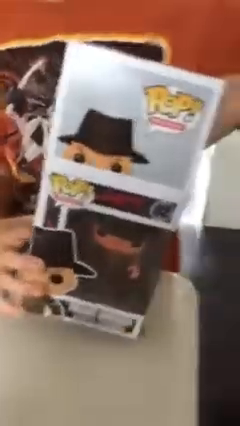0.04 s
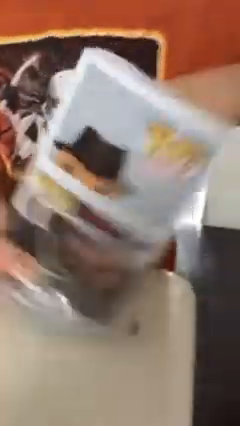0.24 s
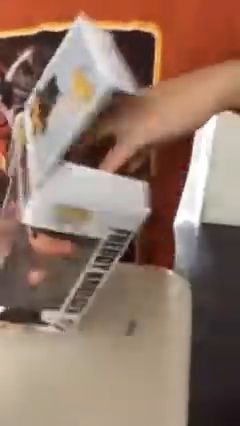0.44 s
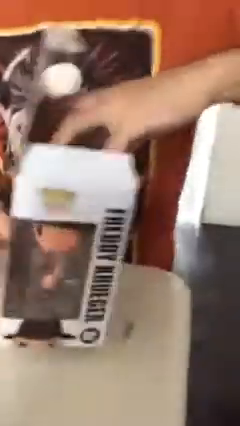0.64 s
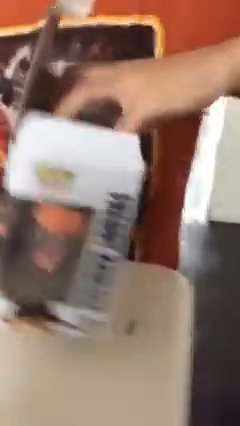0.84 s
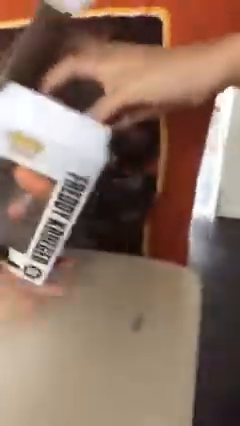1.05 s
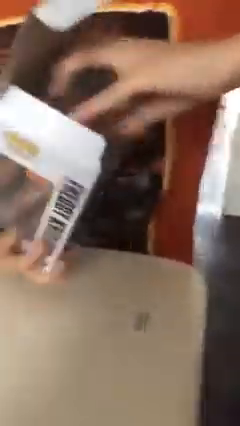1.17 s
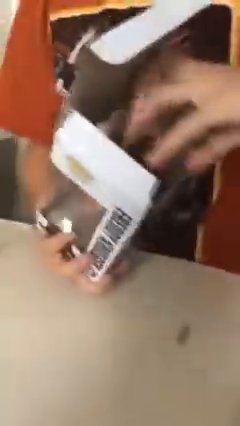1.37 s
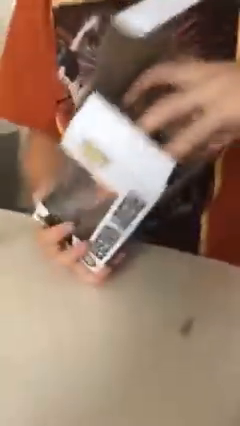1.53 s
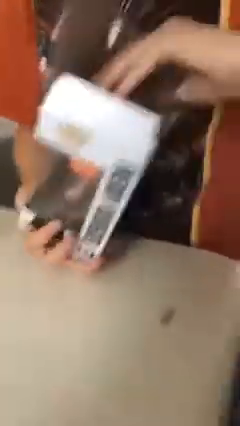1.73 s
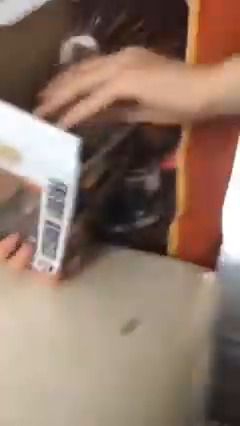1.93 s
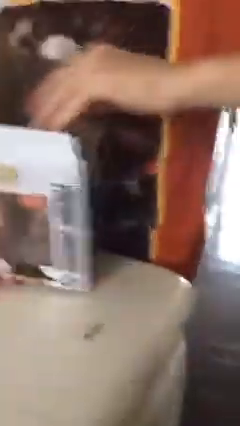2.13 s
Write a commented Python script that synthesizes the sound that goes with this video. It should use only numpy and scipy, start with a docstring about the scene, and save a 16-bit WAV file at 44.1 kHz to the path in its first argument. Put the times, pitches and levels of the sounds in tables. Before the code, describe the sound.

Hard cardboard taps and crinkly plastic snaps as a light empty box is handled in a quiet room

```python
"""A hand turns a small cardboard box with a plastic window on a table in a quiet room.
Under a steady, mostly rumbling air noise the window rustles and fingers rub the card: dense tiny slips ring modes.
Soon edges of the box knock on the table and the window snaps and crackles: rough pushes ring dying modes.
Low dying sines give short dull pushes under hard knocks and longer booms of the table top;
sparse random reflections let the room ring briefly after knocks and snaps."""
import sys
import numpy as np
from scipy import signal
from scipy.fft import rfft, irfft
from scipy.io import wavfile
from scipy.ndimage import uniform_filter1d

SR = 44100
rng = np.random.default_rng(int(sys.argv[2]) if len(sys.argv) > 2 else 0)


def store_pcm(level_fs):
    """Save levels as 16-bit WAV."""
    pcm = np.round(np.clip(level_fs, -1, 1) * 32767).astype(np.int16)
    wavfile.write(sys.argv[1], SR, np.atleast_2d(pcm).T)


def magnitude_from_level(level_db):
    """Linear magnitude for a level in decibels (20 dB per decade)."""
    exponent = np.asarray(level_db, float) / 20
    return 10 ** exponent


N = 97020

# resonances of the cardboard box: pitch_hz [Hz], level_db [dB, relative], t60_s [s]
BOX_MODES = [(440.4, -13.5, 0.07), (558.7, 14, 0.016), (700, 5.5, 0.026), (926, 4.5, 0.018),
             (1059, -9, 0.081), (1170, 11, 0.017), (1449, 4.5, 0.026), (1660, 3.5, 0.021),
             (1798.4, 4.5, 0.018), (1950, 7.5, 0.0083), (2148, 3.5, 0.0097), (2432, -0.5, 0.011),
             (2895, -8.5, 0.013), (3420, -4, 0.011)]
# resonances of the plastic window: pitch_hz [Hz], level_db [dB, relative], t60_s [s]
WINDOW_MODES = [(3625, 15.5, 0.0023), (4660, 11, 0.0028), (5310, -8.5, 0.0084), (5870, 19.5, 0.0012),
                (8140, 12, 0.0022), (8800, 6, 0.0015), (9550, 15, 0.0018), (10990, 8, 0.0026),
                (12110, 7, 0.0012), (14100, -19, 0.00092), (15100, 8.5, 0.0016)]


def read(points, hz):
    """Value of a spectrum table at hz, interpolated over log frequency."""
    f, value = np.transpose(points)
    return np.interp(np.log(hz + 1), np.log(f + 1), value)


def evened(x):
    """Scales to rms 1."""
    return x / np.sqrt(np.mean(x ** 2) + 1e-20)


def add(mix, start_s, sound):
    """Mixes a sound in at start_s, cut at the end of the mix."""
    part = mix[round(start_s * SR):][:len(sound)]
    part += sound[:len(part)]


def panel(hz, centre_hz):
    """Lift in dB of the modes near a panel's favoured pitch."""
    lift_db, width_octaves = 10, 0.24
    return lift_db * np.exp(-(np.log2(hz / centre_hz) / width_octaves) ** 2)


def ring(modes, extra_db):
    """Impulse answers of modes, one row each: sines that swell quickly and die exponentially."""
    swell_cycles = .7  # time constant of the swell, in cycles of the mode
    hz, db, t60 = np.transpose(modes)[:, :, None]
    t = np.arange(2500) / SR
    decay = magnitude_from_level(db + np.reshape(extra_db, (-1, 1)) - 60 * t / t60)
    swell = 1 - np.exp(-t * hz / swell_cycles)
    return decay * swell * np.sin(2 * np.pi * hz * t)


def air():
    """Steady room noise, mostly rumble: white noise shaped by a spectrum."""
    # colour of the room hum: pitch_hz [Hz], density_db [dB per Hz, relative]
    spectrum = [(24, -54), (45, -0.5), (130, -3.5), (210, -6.5), (300, -19), (650, -18), (1600, -26.5),
                (3300, -35.5), (9450, -38.5), (14500, -42.5), (16000, -60)]
    rms_db = -57.5
    hz = np.fft.rfftfreq(N, 1 / SR)
    shaped = irfft(rfft(rng.standard_normal(N)) * magnitude_from_level(read(spectrum, hz)), N)
    return magnitude_from_level(rms_db) * evened(shaped)


def friction(column, modes, slips_per_s, spread_db):
    """Dense random slips, each exciting one mode, under the hand's level curve."""
    # how hard the hand works: time_s [s], card_rub_db [dB], window_rustle_db [dB]
    handling = [(0, -101, -61.5), (.05, -64.5, -107), (.17, -75, -80), (0.211, -60, -59.5), (.30, -82, -51),
                (0.382, -48.5, -59.5), (.50, -65.5, -64.5), (.57, -71, -79), (0.631, -46.5, -46.5),
                (.75, -80, -70), (.86, -64, -68), (.96, -66, -97), (1.07, -101, -90), (1.11, -58.5, -63.5),
                (1.20, -66, -76), (1.299, -38.5, -47.5), (1.369, -56.5, -71), (1.436, -41.5, -46.5),
                (1.495, -52.5, -68), (1.54, -74, -83), (1.63, -60.5, -66), (1.70, -57.5, -60.5),
                (1.725, -60, -74.5), (1.90, -65, -70.5), (1.95, -73.5, -81), (2.04, -54.5, -66),
                (2.12, -72, -84), (2.16, -60.5, -71), (2.2, -62, -73)]
    happens = rng.random(N) < slips_per_s / SR
    strength = magnitude_from_level(spread_db * np.minimum(rng.exponential(1, N), 5))
    slips = strength * happens * rng.choice([-1, 1], N)
    which = rng.integers(0, len(modes), N)
    answers = ring(modes, panel(np.transpose(modes)[0], centre_hz=1750))
    out = np.zeros(N)
    for k, answer in enumerate(answers):
        out += signal.oaconvolve(slips * (which == k), answer)[:N]
    rows = np.transpose(handling)
    level_db = np.interp(np.arange(N) / SR, rows[0], rows[column])
    return evened(out) * magnitude_from_level(level_db)


def window_rustle():
    """The handled plastic rustles: very dense slips ring the window modes."""
    return friction(column=2, modes=WINDOW_MODES, slips_per_s=9000, spread_db=2.4)


def card_rubbing():
    """Fingers rub the card: dense slips ring the box modes."""
    return friction(column=1, modes=BOX_MODES, slips_per_s=3000, spread_db=2.6)


def contact(length_s, rough):
    """A first blow, then a chatter of random pushes that dies over the contact."""
    u = np.arange(1500) / SR / max(length_s, .0005)  # time in contact lengths
    build = np.minimum(0.87 + u / 0.67, 1)  # nearly full from the start
    push = rough * rng.standard_normal(1500) * build * np.exp(-u ** 2)
    push[0] += 1
    return push


def strikes(rows, modes, split_hz, rough, lows, spot_db):
    """Each row rings the modes, tilted below or above split_hz; gives direct sound and room feed."""
    low_cut_hz = 330  # keeps the low skirts of the modes out of knocks and snaps
    wide_t60_share = .45  # heard from all sides, the modes blur: share of their ring time
    direct, wide = np.zeros((2, N))
    hz = np.transpose(modes)[0]
    blurred = np.multiply(modes, [1, 1, wide_t60_share])
    for start_s, level_db, tilt_db, length_s, *favoured_hz in rows:
        lift_db = tilt_db * ((hz < split_hz) == lows) + sum(panel(hz, c) for c in favoured_hz)
        # the struck spot changes each mode at random
        body = ring(modes, lift_db + spot_db * rng.standard_normal(len(hz)))
        rung = signal.fftconvolve(contact(length_s, rough)[None], body, axes=1)
        # each mode keeps its share of energy whatever the push
        share = np.linalg.norm(body, axis=1) / np.linalg.norm(rung, axis=1)
        sound = share @ rung
        loudest = np.sqrt(uniform_filter1d(sound ** 2, 130).max())  # rms over 3 ms
        sound = magnitude_from_level(level_db) * sound / loudest
        # half of the struck colour stays in the room feed, at equal energy
        around = ring(blurred, lift_db / 2).sum(0)
        add(direct, start_s, sound)
        add(wide, start_s, around * np.linalg.norm(sound) / np.linalg.norm(around))
    low_cut = signal.butter(3, low_cut_hz, "high", fs=SR, output="sos")
    return signal.sosfilt(low_cut, np.stack([direct, wide]))


def box_knocks():
    """Edges of the box knock on the table and ring the card; the tilt lifts or cuts the low modes."""
    # knocks, levels ahead of the low cut: start_s [s], level_db [dB], low_tilt_db [dB],
    # contact_s [s], favoured_hz [Hz, of the struck panel]
    knocks = [(.0625, -40, 21, 0.0055, 610), (.1635, -58, -7, 0.0029, 980), (.2197, -18, -11, 0.0047, 1170),
              (.2290, -14.5, 5, 0.0055, 2050), (.4070, -29.5, 1, 0.0034, 700),
              (.6075, -45, 26, 0.0052, 725), (.6382, -17, -2.5, 0.003, 1885), (.6560, -32, 5, 0.0052, 514),
              (.6967, -21.5, -2, 0.0035, 2260), (.7995, -47.5, 18, 0.0025, 517),
              (.8270, -40.5, -37, 0.0058, 1600), (.8725, -38, -5.5, 0.0053, 633),
              (1.0240, -49, 4, 0.0076, 430), (1.0935, -42, 2.5, 0.011, 1100),
              (1.2295, -42.5, 11, 0.011, 1510), (1.2562, -14.5, -7, 0.0025, 2350),
              (1.3406, -36.5, -31, 0.0055, 1660), (1.3845, -36.5, -13, 0.004, 1830),
              (1.7415, -30.5, -23, 0.0045, 2080), (1.7465, -41.5, 13, 0.005, 565),
              (2.0300, -43.5, -9, 0.014, 700), (2.0393, -33, -18, 0.0048, 1760),
              (2.0540, -39.5, -0.5, 0.0092, 1670), (2.1018, -34, 5.5, 0.00052, 1730),
              (2.1750, -41.5, 3.5, 0.0094, 1600)]
    return strikes(knocks, BOX_MODES, split_hz=800, rough=0.35, lows=True, spot_db=1.5)


def room(x):
    """Sparse random reflections, each band dying at its own speed."""
    # ring of the room: pitch_hz [Hz], t60_s [s]
    decay_times = [(150, 0.85), (400, 0.32), (1040, 0.51), (2760, 0.41), (7280, 0.31), (14000, 0.34)]
    gap_s = .004  # silence ahead of the reflections
    taps = np.zeros(SR // 2)
    at = np.arange(0, SR // 2 - 20, 20)
    taps[at + rng.integers(0, 20, len(at))] = rng.choice([-1., 1.], len(at))
    hz, t, z = signal.stft(taps, SR, nperseg=256)
    decay = magnitude_from_level(-60 * t / read(decay_times, hz)[:, None])
    tail = signal.istft(z * decay, SR, nperseg=256)[1]
    tail = np.concatenate([np.zeros(round(gap_s * SR)), tail / np.linalg.norm(tail)])
    return signal.fftconvolve(x, tail)[:N]


def window_snaps():
    """The plastic window snaps and crackles in short bursts; the tilt lifts or cuts its upper modes."""
    # snaps, levels ahead of the low cut: start_s [s], level_db [dB], treble_tilt_db [dB], length_s [s]
    snaps = [(.1885, -54, 9, 0.004), (.2200, -21, -2, 0.0059), (.2305, -29, 1, 0.018),
             (.4070, -47, 43, 0.0073), (.5890, -48, 11, 0.0026), (.6380, -28, -4, 0.0056),
             (.6978, -37.5, -37, 0.0055), (.8275, -51, 8, 0.004), (.8345, -43.5, -5, 0.0061),
             (.8745, -53, -28, 0.0061), (.9360, -52.5, -0.5, 0.0024), (1.0415, -51.5, -1.5, 0.0028),
             (1.0935, -54, 5, 0.0037), (1.1830, -62, -6, 0.0038), (1.2280, -51, -1, 0.0018),
             (1.2365, -46, -2, 0.0011), (1.2560, -19.5, 1, 0.0044), (1.3390, -39.5, -9, 0.0041),
             (1.3820, -37, -4, 0.0066), (1.4245, -40.5, 15, 0.0018), (1.4300, -38.5, 0.5, 0.0028),
             (1.4370, -46, -8, 0.0044), (1.4480, -39, -5, 0.0013), (1.4565, -47, 0, 0.0018),
             (1.4690, -48, -11, 0.0032), (1.7420, -37, -20.5, 0.0043), (2.0145, -57, 10, 0.001),
             (2.0290, -37.5, -1.5, 0.0055), (2.0363, -39.5, 1, 0.0023), (2.0410, -45.5, -2, 0.018),
             (2.0487, -36.5, 24, 0.0017), (2.0550, -45, 31, 0.0031), (2.0605, -39, 35, 0.0018),
             (2.1740, -46, -5, 0.011)]
    return strikes(snaps, WINDOW_MODES, split_hz=7000, rough=0.37, lows=False, spot_db=4)


def low_thumps():
    """Short dull pushes under hard knocks and longer booms of the table top: dying sines, swelling at first."""
    # low thumps: start_s [s], level_db [dB], pitch_hz [Hz], t60_s [s]
    thumps = [(.236, -33, 149, 0.14), (0.641, -43, 88, 0.16), (0.697, -17.5, 330, 0.0098),
              (1.2543, -14.5, 330, 0.015), (2.177, -39, 109, 0.34)]
    out, t = np.zeros(N), np.arange(8000) / SR
    for start_s, level_db, hz, t60 in thumps:
        swell = np.minimum(2 * t * hz, 1)  # over the first half cycle
        add(out, start_s, swell * magnitude_from_level(level_db - 60 * t / t60) * np.sin(2 * np.pi * hz * t))
    return out


def scene():
    """Handling, knocks, snaps and low thumps in the room."""
    handling = window_rustle() + card_rubbing()
    box, box_wide = box_knocks()
    window, window_wide = window_snaps()
    wet = room(magnitude_from_level(-12) * box_wide + magnitude_from_level(-9) * window_wide)
    return (air() + handling + box + wet + window + low_thumps())[None]


def top_cut(x):
    """Nothing passes above the cut-off."""
    return signal.sosfilt(signal.butter(12, 16510, fs=SR, output="sos"), x)


def record(dry):
    """Band limits of the microphone: a low cut and a steep treble edge."""
    low_cut_hz, edge_hz = 55, 15380
    low_cut = signal.butter(3, low_cut_hz, "high", fs=SR, output="sos")
    edge = signal.firwin(255, edge_hz, window=("kaiser", 3), fs=SR)[None]
    mix = signal.oaconvolve(signal.sosfilt(low_cut, dry), edge, "same")
    return top_cut(mix)


dry = scene()
out = record(dry)
store_pcm(out)
```